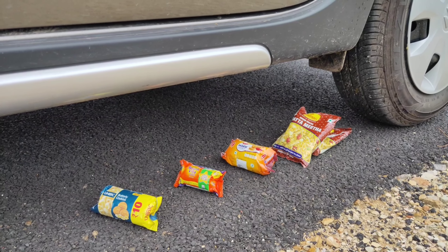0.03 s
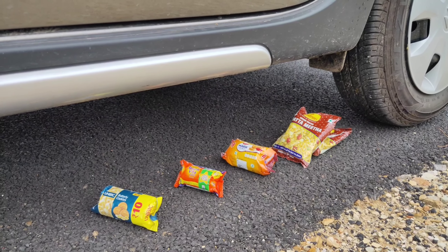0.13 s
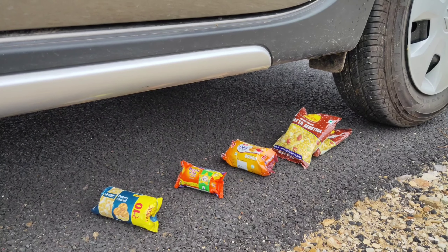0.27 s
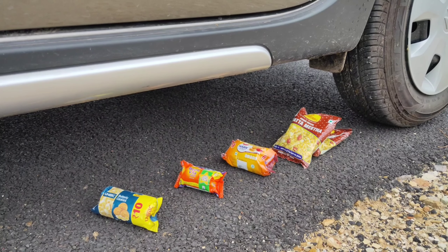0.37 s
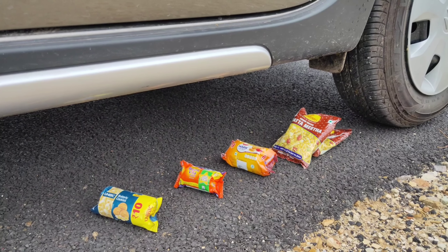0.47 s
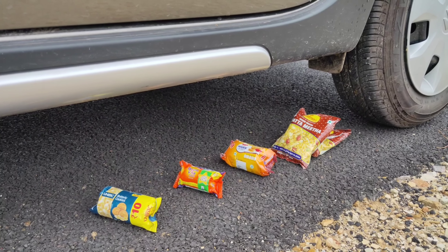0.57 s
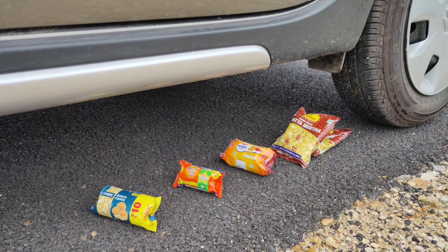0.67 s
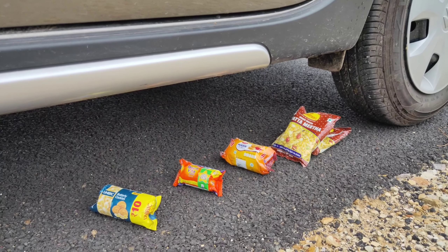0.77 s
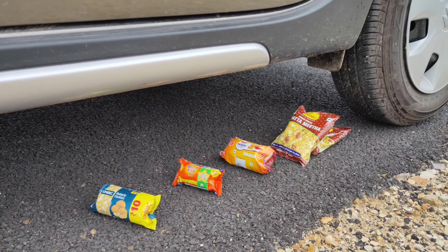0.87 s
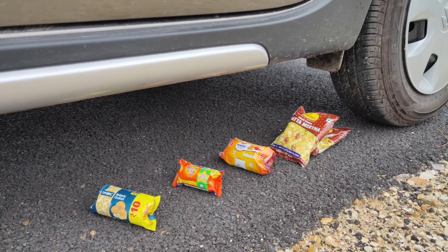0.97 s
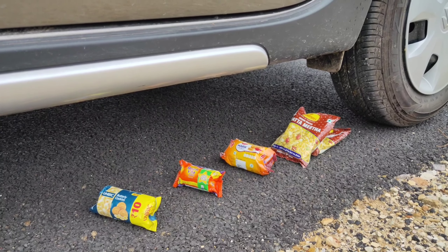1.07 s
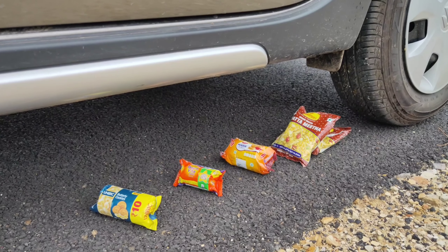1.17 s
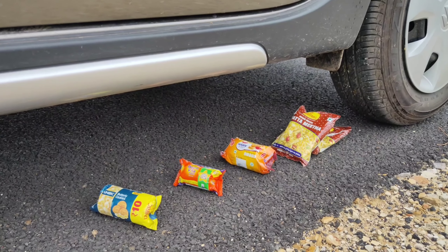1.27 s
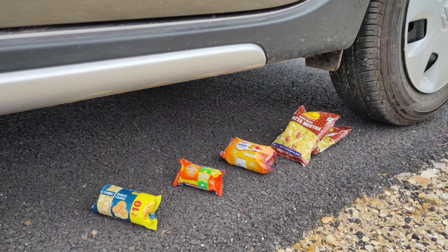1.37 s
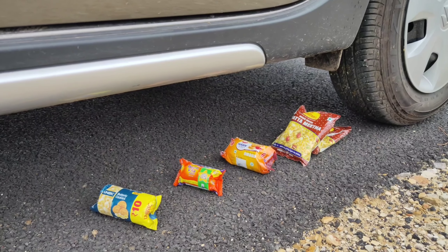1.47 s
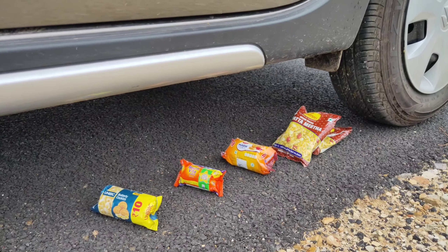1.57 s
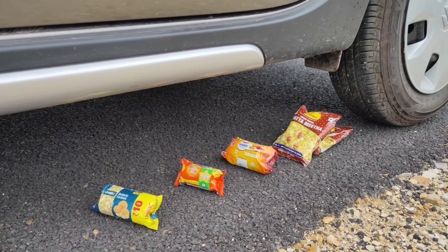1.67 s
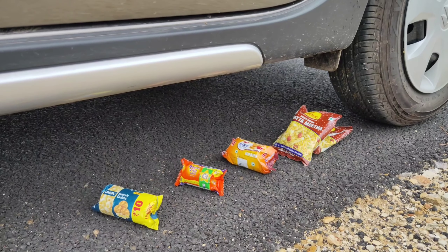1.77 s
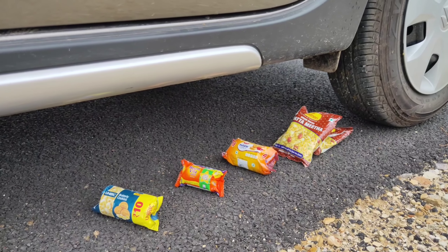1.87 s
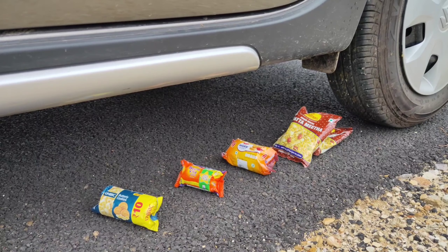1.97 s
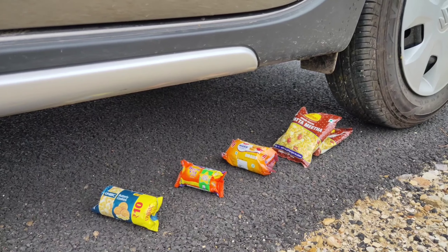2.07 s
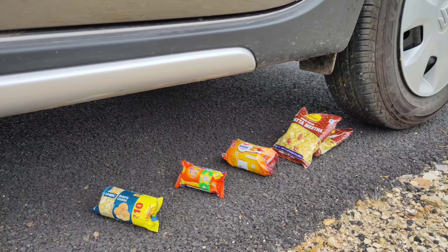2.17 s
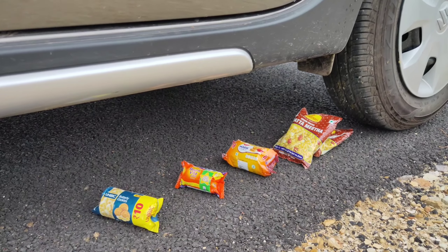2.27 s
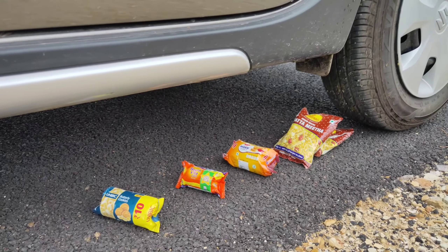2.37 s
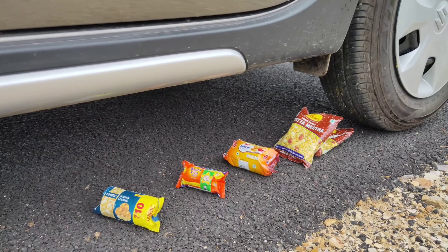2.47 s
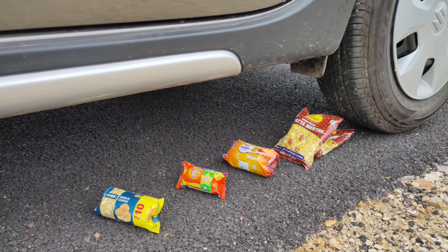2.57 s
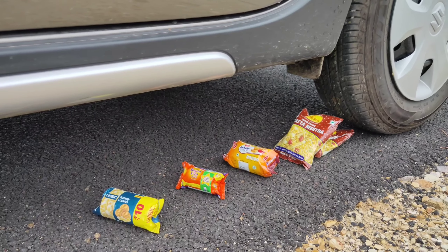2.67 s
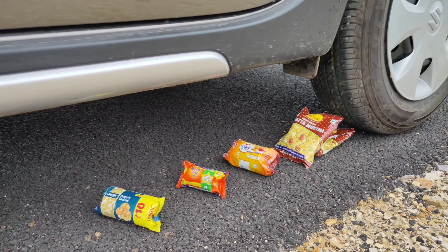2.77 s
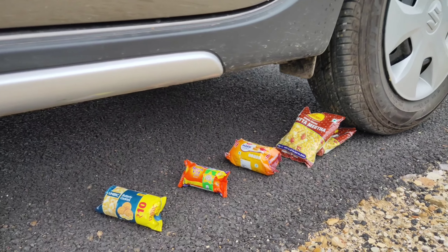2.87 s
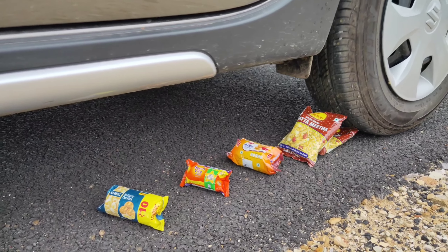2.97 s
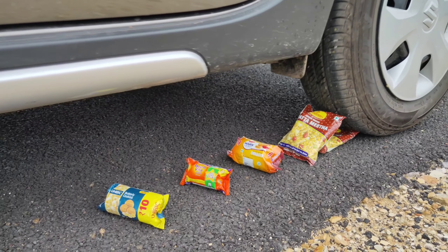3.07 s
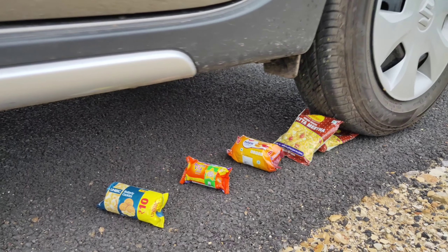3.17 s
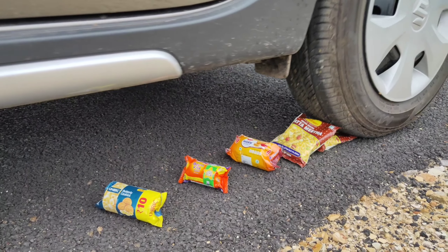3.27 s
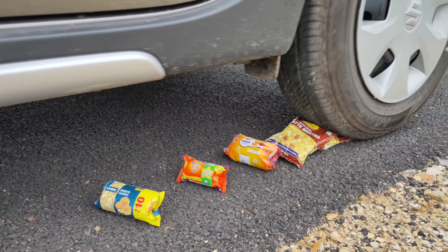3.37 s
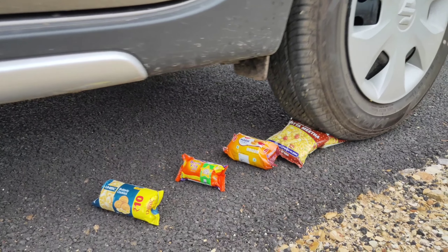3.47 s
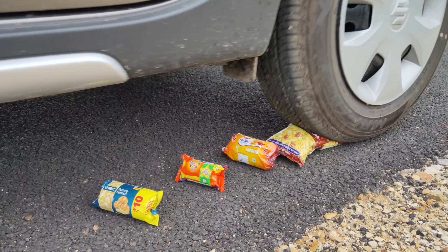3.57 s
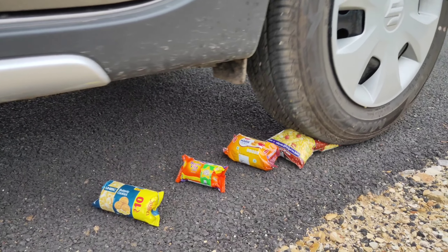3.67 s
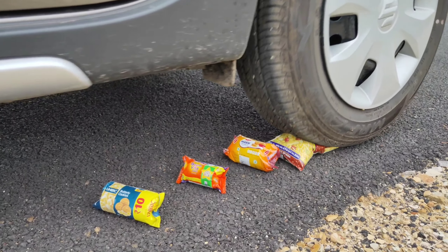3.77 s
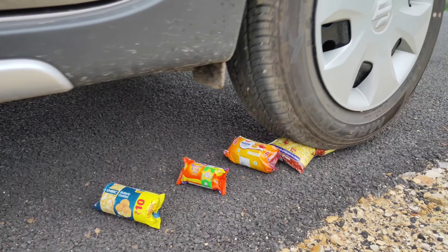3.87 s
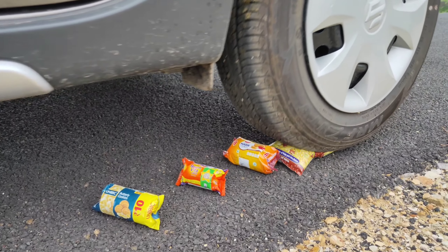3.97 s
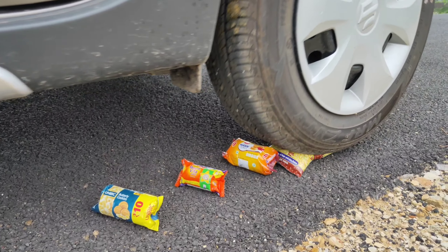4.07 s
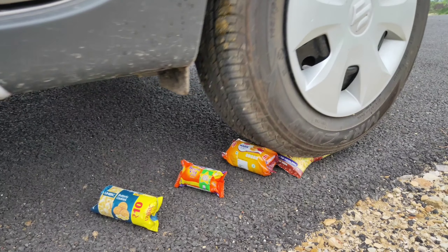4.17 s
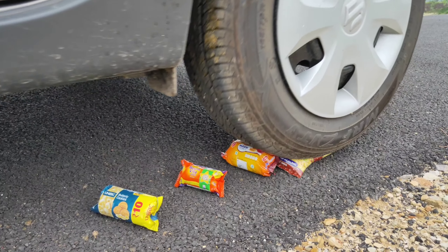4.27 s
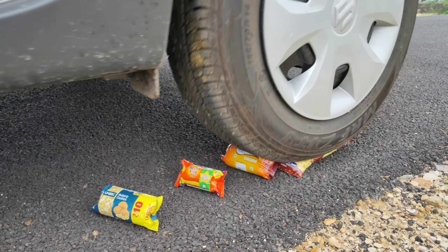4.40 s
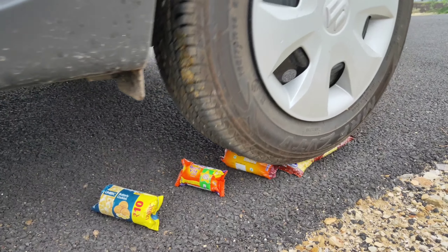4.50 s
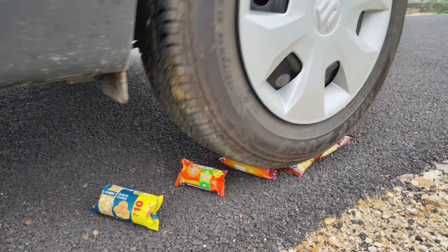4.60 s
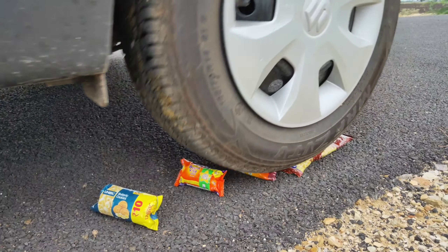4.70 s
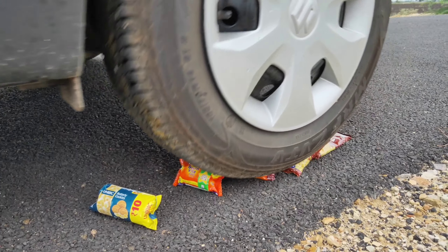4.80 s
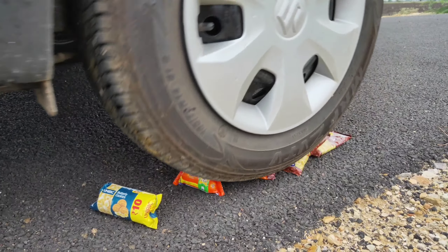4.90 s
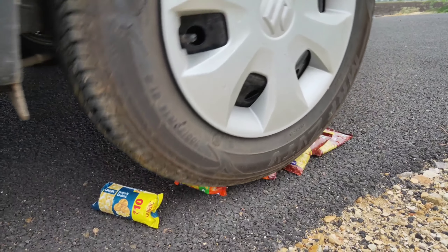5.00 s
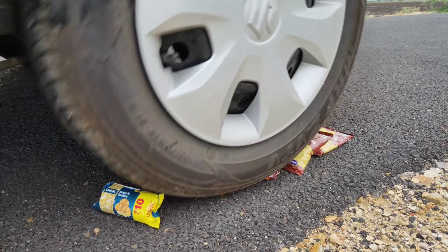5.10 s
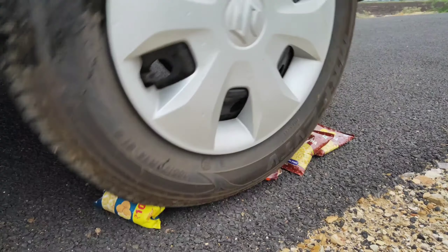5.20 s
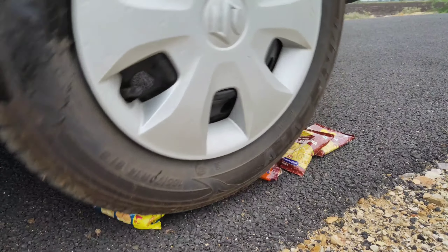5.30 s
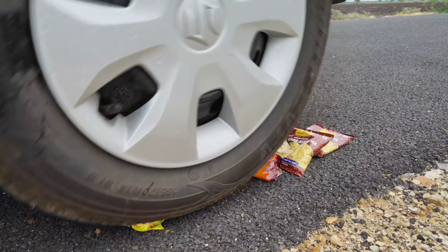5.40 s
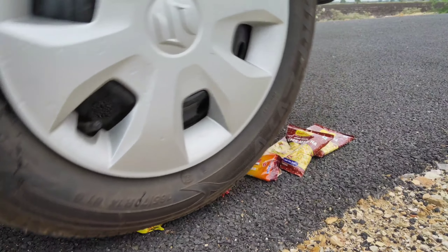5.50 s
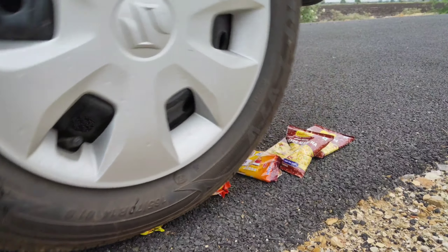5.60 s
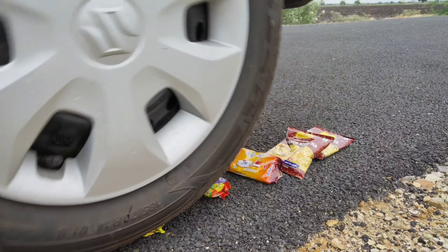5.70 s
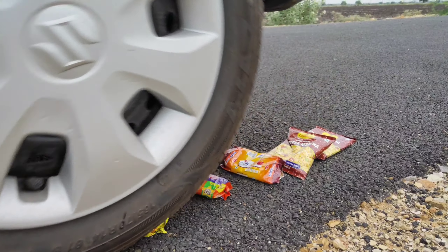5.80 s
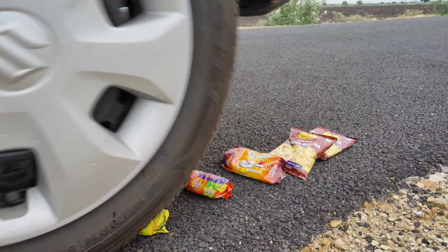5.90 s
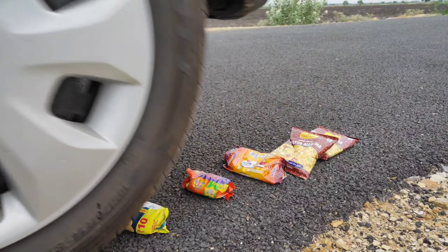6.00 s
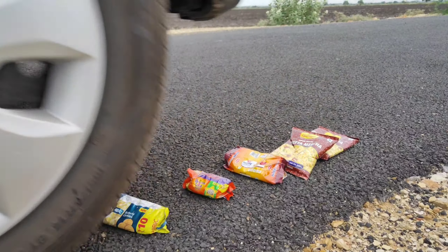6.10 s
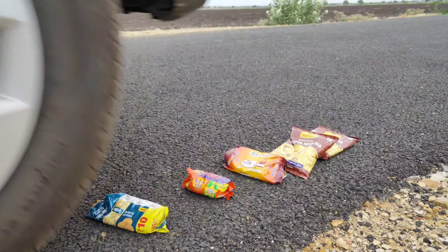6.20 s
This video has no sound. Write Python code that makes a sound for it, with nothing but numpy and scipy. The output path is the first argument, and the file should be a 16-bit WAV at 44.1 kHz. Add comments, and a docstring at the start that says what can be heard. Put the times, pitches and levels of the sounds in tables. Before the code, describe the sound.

Close, low phone pickup at a roadside. From 0 to 3.1 s there is only a soft, deep engine idle, throbbing rapidly and wavering, with small hollow whoops sagging in pitch around 0.3 s and from 0.9 to 1.8 s, over very faint hiss and a low flutter of air. At about 3.2 s the tyre touches the first packet: fine clicks and dull crunches swell to a first cluster around 3.4 to 3.8 s, ease slightly near 4.2 s, then thicken from 4.4 to 4.8 s with bright film ticks and dry biscuit splits. Another packet cracks at 5.0 s, and at 5.14 s one bursts with a loud, sharp pop, a brief hollow ring and scattering crumbs. Dense hard snaps continue to 5.5 s while the engine rumble peaks near 5.3 s. Afterwards the crackling thins to loose unfolding crinkles and isolated ticks at 5.74 and 6.09 s, over the receding engine.

```python
"""Car crushing snack packets

A car creeps over sealed snack packets on asphalt, heard from a phone held low. The idling engine is throbbing
filtered noise and wavering tones. Plastic film and biscuits crackle as random clicks, with louder timed cracks.
One packet bursts with a pop: a push of air, a suction and a short ring. Each crack echoes off road and underbody.
Faint background noise in flickering narrow bands and a low flutter of air lie behind."""
import sys
import numpy as np
from scipy import signal
from scipy.fft import rfft, irfft
from scipy.io import wavfile
from scipy.ndimage import uniform_filter1d, map_coordinates

SR = 44100
rng = np.random.default_rng(int(sys.argv[2]) if len(sys.argv) > 2 else 0)


def int16_out(signal):
    """Quantize to a 16-bit WAV file."""
    q = np.round(np.clip(np.atleast_2d(signal).T, -1, 1) * 32767)
    wavfile.write(sys.argv[1], SR, q.astype(np.int16))


N = 275625
TIME = np.arange(N) / SR


def undb(db):
    """Turn decibels into a gain."""
    return 10 ** (np.asarray(db) / 20)


def unit(x):
    """Scale to an average strength (rms) of 1."""
    return x / np.sqrt(np.mean(x ** 2))


def butter(x, order, hz, kind):
    """Keep only the low, high or middle ("band") frequencies."""
    return signal.sosfilt(signal.butter(order, hz, kind, fs=SR, output="sos"), x)


def curve(rows):
    """Join the (time, value) points of a table with straight lines."""
    times, values = np.transpose(rows)
    return np.interp(TIME, times, values)


def walk(rate):
    """Slow random drift with an rms of 1, taking about `rate` new directions a second."""
    step = int(SR / rate)
    held = np.repeat(rng.standard_normal(N // step + 4), step)
    smooth = uniform_filter1d(uniform_filter1d(held, step), step)
    return unit(smooth[step:step + N])


def colour(x, points, size=4096):
    """Filter to a (frequency, level) shape; the filter has unit energy and starts at once (minimum phase)."""
    hz, db = np.transpose(points)
    grid = np.maximum(np.fft.rfftfreq(size, 1 / SR), 1)
    shape = undb(np.interp(np.log(grid), np.log(hz), db))
    cepstrum = irfft(np.log(shape))
    response = irfft(np.exp(rfft(2 * cepstrum[:size // 2], size)))
    return signal.fftconvolve(x, response / np.linalg.norm(response))[:len(x)]


def tone(hz, t):
    """Steady sine wave."""
    return np.sin(2 * np.pi * hz * t)


def gliding_phase(hz):
    """Phase of a wave whose pitch changes: add up the cycles sample by sample."""
    return 2 * np.pi * np.cumsum(hz) / SR


def fade(t, t60):
    """Dying away by 60 dB in t60 seconds."""
    return np.exp(-np.log(1000) * t / t60)


def add(out, s, sound):
    """Mix a sound in at time s."""
    i = int(s * SR)
    out[i:i + len(sound)] += sound[:N - i]


def grains(rate, spread_db):
    """Random clicks of very unequal size, about `rate` a second, rms 1."""
    chance = rng.random(N)
    size = np.minimum(rng.exponential(size=N), 3.8)  # no click may grow without limit
    return unit((chance < rate / SR) * rng.choice([-1, 1], N) * undb(spread_db * size))


# bands of faint background noise: (centre [Hz], width [Hz], level [dB])
NOISE_BANDS = [(1508, 300, -88.5), (1927, 485, -81.5), (2710, 1300, -90.5), (4420, 1600, -89.5),
               (6595, 1230, -79)]


def flickering_noise(count=4):
    """Faint background noise: narrow bands whose levels flicker independently, with separate noise at each port."""
    flicker_db, flickers_per_s = 5.5, 24
    out = 0
    for hz, width_hz, db in NOISE_BANDS:
        edges = hz + width_hz * np.linspace(-.5, .5, count + 1)
        for low, high in zip(edges, edges[1:]):
            band = butter(rng.standard_normal((2, N)), 2, [low, high], "band")
            flickering = unit(band * undb(flicker_db * walk(flickers_per_s)))
            out = out + flickering * undb(db) / np.sqrt(count)
    return out


def breeze(db=-68):
    """A light, low flutter of air: deep noise, unrelated at the two ports."""
    return undb(db) * unit(butter(rng.standard_normal((2, N)), 2, 170, "low"))


# soft low whoops in the rumble: (time [s], peak level [dB])
WHOOP_TIMES = [(0.276, -48), (0.862, -44), (1.04, -40), (1.239, -41), (1.465, -41), (1.839, -39.5),
               (3.261, -45), (3.446, -43.5), (3.634, -41.5), (3.869, -40.5), (4.245, -42.5), (5.842, -42.5),
               (6.032, -44.5)]


def whoops(start_hz=188, end_hz=138):
    """Short hollow tones that swell, die down and sag in pitch."""
    length_s, lead_s = .09, .026  # each starts a little before its listed time
    out, t = np.zeros(N), TIME[:int(length_s * SR)]
    hz = start_hz + (end_hz - start_hz) * t / length_s
    swell = np.sin(np.pi * t / length_s) ** 2
    for s, db in WHOOP_TIMES:
        add(out, s - lead_s, undb(db) * swell * np.sin(gliding_phase(hz)))
    return out


# tone colour of the engine rumble: (frequency [Hz], relative level [dB])
RUMBLE_COLOUR = [(25, -22.5), (45, -20), (75, -11.5), (115, -4), (160, -5.5), (200, -8.5), (250, -8.5),
                 (420, -17), (540, -13.5), (700, -16.5), (900, -31), (1200, -40.5), (3000, -70)]
# rumble level as the car draws level and passes, before its random wobble: (time [s], level [dB])
RUMBLE_LEVEL = [(0, -55.5), (1.7, -53), (2.1, -52.5), (4.2, -52), (5.3, -46), (6.25, -53)]
# tones of the idling car, before wobble and fade: (frequency [Hz], level [dB])
IDLE_TONES = [(21.7, -56.5), (65.3, -76.5), (157, -60), (300.5, -60), (547, -66.5)]
FIRING_HZ = 22.95  # average, it wavers a little
HUM_FADE_DB_PER_S = .5


def engine():
    """Rumble that throbs with each firing, under wavering tones that fade as the engine moves away."""
    throb = 1 + 0.17 * np.cos(gliding_phase(FIRING_HZ * (1 + 0.013 * walk(2.7))))
    rumble = colour(rng.standard_normal(N) * throb, RUMBLE_COLOUR)
    rumble = rumble * undb(curve(RUMBLE_LEVEL) + 1.3 * walk(11.0))
    hum = 0
    for hz, db in IDLE_TONES:
        level = undb(db + 2 * walk(19))
        hum = hum + level * unit(np.sin(gliding_phase(hz * (1 + 0.009 * walk(12)))))
    return rumble + hum * undb(-HUM_FADE_DB_PER_S * TIME)


UNFOLD_T60 = 4.54  # s, slow tail of unfolding film and loose crumbs


def squeeze(flat_s, squeeze_s, hold_s, t60, tail_db):
    """Strain grows until the packet is flat, holds, then drops, leaving a weak, slow tail."""
    before = np.maximum(flat_s - TIME, 0)
    after = np.maximum(TIME - flat_s - hold_s, 0)
    return np.exp(-before / squeeze_s) * np.hypot(fade(after, t60), undb(tail_db) * fade(after, UNFOLD_T60))


# packets going under the tyre: (flattest at [s], squeeze time [s], hold [s],
#   relative film crinkle level [dB], relative biscuit crunch level [dB], lag of the left port [ms])
PACKET_ROW = [(3.579, 0.22, 0.058, -47.5, -41.5, -0.095), (3.764, 0.12, 0.031, -47, -57.5, -0.065),
              (4.472, 0.16, 0.32, -41.5, -42, 0.049), (5.036, 0.17, 0.14, -43, -45.5, 0.041),
              (5.339, 0.04, 0.14, -40, -39.5, 0.255)]
CRUNCH_T60, CRINKLE_T60 = 1, 0.54  # s
UNFOLD_DB, LEFTOVER_DB = -11, -19  # unfolding film and loose crumbs, against the packet's peak
TOUCH_S, LEAVE_S, LEAVE_T60 = 3.16, 5.96, 0.88  # the tread meets the first packet and rolls off the last
GRIP_S = 0.05  # the tread takes hold gradually
CRUNCH_SHARE = 0.7  # biscuits break mostly in the later part of the squeeze


def strain():
    """Crinkle and crunch levels, packet by packet; film holds under full weight while crunch already fades."""
    grip = np.clip((TIME - TOUCH_S) / GRIP_S, 0, 1) ** 2
    contact = grip * fade(np.maximum(TIME - LEAVE_S, 0), LEAVE_T60)
    crinkle = crunch = 0  # the packets add up as powers
    for s, squeeze_s, hold_s, film_db, crumb_db, _ in PACKET_ROW:
        film = squeeze(s, squeeze_s, hold_s, CRINKLE_T60, UNFOLD_DB)
        crumbs = squeeze(s, CRUNCH_SHARE * squeeze_s, 0, CRUNCH_T60, LEFTOVER_DB)
        crinkle += (undb(film_db) * film) ** 2
        crunch += (undb(crumb_db) * crumbs) ** 2
    return contact * np.sqrt(crinkle), contact * np.sqrt(crunch)


RATE_POWER = 0.5  # the harder the squeeze, the more grains a second


def crackle(level, rate, spread_db):
    """Clicks that follow a level: sparser under light strain, denser under heavy; `rate` is the densest."""
    density = np.maximum(level / level.max(), .03) ** RATE_POWER
    return level * unit(grains(rate * density, spread_db) / np.sqrt(density))


# tone colour of crinkling film: (frequency [Hz], relative level [dB])
FILM_COLOUR = [(300, 0), (1000, -10), (1500, -3), (2100, -0.5), (2600, -7.5), (3200, -2.5), (4200, -0.5),
               (5600, 2.5), (6700, 10), (7400, 5), (8100, -21.5)]
# tone colour of breaking crumbs, also used for splinters and spilling: (frequency [Hz], relative level [dB])
CRUMB_COLOUR = [(60, -29.5), (150, -9), (400, -0.5), (620, -1.5), (950, -1), (1110, -7), (1280, -10),
                (1520, -17.5), (2100, -11), (3500, -20), (8000, -40.5)]


def crushing(crinkle, crunch, film_db=-1.5, crumb_db=-2.5, shared=0.81):
    """One spot under the tread: creases flip in the film and crumbs break beneath it, in fits and starts."""
    fits_db, fits_per_s = 2.6, 140
    fits = unit(undb(fits_db * walk(fits_per_s)))
    film = crackle(crinkle, rate=950, spread_db=4.3)
    crumbs = crackle(crunch, rate=450, spread_db=3.9)
    both = shared * grains(rate=160, spread_db=-0.5)  # some breaking crumbs flip the film too
    # each patch of film is creased its own way and has its own colour
    patch = [(hz, db + 2 * rng.standard_normal()) for hz, db in FILM_COLOUR]
    film_sound = colour((film + both * crinkle) * fits, patch)
    crumb_sound = colour((crumbs + both * crunch) * fits, CRUMB_COLOUR)
    return undb(film_db) * film_sound + undb(crumb_db) * crumb_sound


def snap(buckle_s=.0014, rustle=.12, rustle_t60=.04, click=3.):
    """A sharp click and a quick run of tiny ones, then a rustle, as when taut film buckles; unit energy."""
    t = TIME[:SR // 10]
    clicks = rng.standard_normal(len(t)) * np.exp(.5 * rng.standard_normal(len(t)))
    run = clicks * (np.exp(-t / buckle_s) + rustle * fade(t, rustle_t60))
    run[0] = click
    return run / np.linalg.norm(run)


# the loudest fractures: (time [s], relative levels of film tick, biscuit split and knock [dB], knock pitch [Hz])
FRACTURES = [(3.2136, -22.5, -25.5, -35.5, 300.0), (3.2432, -30, -21, -33, 440.0),
             (3.2962, -33, -33, -30.5, 440.0), (3.3447, -33, -22, -41, 930.0),
             (3.3936, -16, -25.0, -27.5, 440.0), (3.458, -16, -23, -38.0, 470.0),
             (3.5547, -18, -16, -23.5, 740.0), (3.5796, -19, -32, -18, 690.0),
             (3.5978, -25, -20, -30, 710.0), (3.6427, -8.5, -21, -42.0, 380.0),
             (3.6934, -30, -20.5, -27, 410.0), (3.7319, -16.5, -23, -27, 950.0),
             (3.7638, -15, -33, -23.5, 890.0), (3.8036, -21, -19, -37, 930.0),
             (3.8167, -18.5, -24, -45, 430.0), (3.9484, -18.5, -40, -44.0, 260.0),
             (3.9936, -16.5, -17, -39.5, 590.0), (4.02, -28, -34, -50.0, 270.0),
             (4.0587, -19, -26.5, -51, 460.0), (4.0709, -20.5, -31, -50, 270.0),
             (4.2372, -19.5, -35.5, -50, 560.0), (4.2931, -18.5, -31, -31, 610.0),
             (4.3747, -15, -17, -29, 580.0), (4.4084, -18.5, -21.5, -24.5, 930.0),
             (4.4572, -23, -17.5, -24, 880.0), (4.4905, -13, -16, -38, 940.0),
             (4.5002, -19, -21, -31.5, 450.0), (4.5183, -10, -28, -19, 730.0),
             (4.5224, -11.5, -26, -30, 720.0), (4.556, -14.0, -25, -19.5, 420.0),
             (4.6301, -13.5, -13.5, -22, 570.0), (4.639, -23, -21.0, -30.5, 360.0),
             (4.6537, -14.5, -18.5, -33, 540.0), (4.6863, -28, -21, -27, 920.0),
             (4.6974, -15, -18.0, -33, 520.0), (4.7695, -13, -15, -33.5, 260.0),
             (4.9463, -30, -26, -30, 410.0), (4.9547, -25, -36, -30.5, 430.0),
             (5.0033, -12.5, -21.5, -14, 420.0), (5.0144, -22, -16.0, -21, 440.0),
             (5.022, -13.5, -15.5, -24, 410.0), (5.0593, -22.5, -15, -28.5, 440.0),
             (5.081, -15.5, -23, -25, 360.0), (5.0965, -13, -18.5, -16.5, 420.0),
             (5.1744, -12.5, -7.5, -20, 270.0), (5.1791, -6.5, -17, -23, 470.0),
             (5.2051, -19, -19, -30, 460.0), (5.2534, -23, -18.5, -41.5, 530.0),
             (5.312, -12, -19, -38.5, 720.0), (5.3284, -27, -17, -36.5, 890.0),
             (5.3458, -13.5, -17, -44, 780.0), (5.3518, -18, -20, -41, 260.0),
             (5.373, -22, -25, -32, 510.0), (5.387, -9, -19.5, -20.0, 670.0),
             (5.4181, -11.0, -13.5, -15.5, 390.0), (5.4273, -11.5, -24, -24, 440.0),
             (5.449, -24, -28, -32, 380.0), (5.4674, -17, -29, -26.5, 260.0),
             (5.5227, -22, -23.5, -29.5, 420.0), (5.74, -37, -27.5, -37.5, 740.0),
             (6.087, -25.5, -34.5, -39, 320.0)]
# tone colour of a film tick: (frequency [Hz], relative level [dB])
TICK_COLOUR = [(1000, -18), (4200, -18.5), (5600, -7), (6800, 8), (7400, 2), (8100, -18)]
# tone colour of a biscuit split: (frequency [Hz], relative level [dB])
SPLIT_COLOUR = [(400, -13), (1100, -2.5), (1260, -2.5), (1520, -3.5), (2100, -5.5), (2650, -12.5),
                (3100, -4), (4500, -1.5), (5600, 1.5), (7500, -19.5)]


def own_colour(shape, spread_db=2.0):
    """Shift each point of a tone colour by chance, since no two creases or pieces are alike."""
    return [(hz, db + spread_db * rng.standard_normal()) for hz, db in shape]


def cracks(tick_db=0, split_db=1, knock_db=0, cycles=5.63, splinter_db=-8, splinter_t60=0.059, low_cut_hz=150):
    """A biscuit splits, knocks for a few cycles and splinters; the film ticks differently toward each port."""
    splits, knocks, splinters = np.zeros((3, N))
    ticks, t = np.zeros((2, N)), TIME[:SR // 10]
    for s, film_db, break_db, body_db, hz in FRACTURES:
        crease, piece = own_colour(TICK_COLOUR), own_colour(SPLIT_COLOUR)
        for port in ticks:
            add(port, s, undb(film_db + tick_db) * colour(snap(), crease))
        add(splits, s, undb(break_db + split_db) * colour(snap(), piece))
        add(knocks, s, undb(body_db + knock_db) * tone(hz, t) * fade(t, cycles / hz))
        add(splinters, s, undb(body_db + splinter_db) * fade(t, splinter_t60) / 2)
    knocks = butter(knocks, 1, low_cut_hz, "high")  # the knocks carry little deep bass
    splintering = colour(splinters * grains(rate=3100, spread_db=2.5), CRUMB_COLOUR)
    return splits + knocks + splintering, ticks


# tone colour of the tearing film: (frequency [Hz], relative level [dB])
TEAR_COLOUR = [(300, -9.5), (1300, 9), (1550, -7.5), (2100, 9.5), (2700, 2.5), (4000, -0.5), (6700, 2),
               (8000, -7.5)]
POP_S = 5.1441  # when the packet bursts


def tear(tear_db=7.5, fray_db=-9):
    """The seam frays for an instant, then the film whips apart, differently toward each port."""
    out, fray_s = np.zeros((2, N)), .003
    for port in out:
        add(port, POP_S - fray_s, undb(fray_db) * colour(snap(), TEAR_COLOUR))
        add(port, POP_S, undb(tear_db) * colour(snap(buckle_s=0.00073), TEAR_COLOUR))
    return out


# the burst packet's ring: (frequency [Hz], level [dB], time to fall 60 dB [s])
POP_RING = [(141.7, -24, 0.27), (209, -31, 0.13), (256, -27, 0.1), (472, -36.5, 0.14), (726, -20.5, 0.018),
            (974, -14, 0.017), (1295, -26.5, 0.049)]


def pop(blast_db=-4, seam_db=-10, spill_db=-35, spill_t60=0.28, flap_db=-27, flap_t60=0.27):
    """The seam gives, trapped air escapes in one push and suction; the slack packet flaps and crumbs spill."""
    out, t = np.zeros(N), TIME[:SR // 3]
    push_s, seam_lead_s, suction = .0007, .0011, .55
    push = np.sin(np.pi * t / push_s) * (t < push_s)
    pull = np.sin(np.pi * t / (2 * push_s)) * (t < 2 * push_s)  # weaker but twice as long
    ring = sum(undb(db) * tone(hz, t) * fade(t, t60) for hz, db, t60 in POP_RING)
    spill = colour(grains(rate=1500, spread_db=3)[:len(t)] * fade(t, spill_t60), CRUMB_COLOUR)
    flaps = unit(butter(grains(rate=370, spread_db=2.5), 2, [120, 560], "band"))
    add(out, POP_S - seam_lead_s, undb(seam_db) * push)
    add(out, POP_S, undb(blast_db) * push + undb(spill_db) * spill)
    add(out, POP_S, undb(flap_db) * flaps[:len(t)] * fade(t, flap_t60))
    add(out, POP_S + push_s, -undb(blast_db) * suction * pull - ring)
    return out


def underbody(x, early_db=-8, late_db=-19, late_t60=0.7):
    """Scattered echoes from wheel arch, floor pan and road, different at each port; long waves slip past."""
    t, early_t60, scatter_hz = TIME[:SR // 3], .03, 700
    response = 0
    for db, t60 in [(early_db, early_t60), (late_db, late_t60)]:
        tail = rng.standard_normal((2, len(t))) * fade(t, t60) * (t > .0015)  # echoes arrive after 1.5 ms
        response = response + undb(db) * unit(tail)
    response = butter(response, 1, scatter_hz, "high")
    return signal.fftconvolve(x[None], response / np.sqrt(len(t)), axes=1)[:, :N]


def ports(x, lag_ms, pan_db):
    """Sound reaches the two microphone ports at different times and levels; positive: left later, louder."""
    half = lag_ms * SR / 2000  # samples: half the lag for each port
    left, right = (map_coordinates(x, [np.arange(N) - side * half], order=3) for side in (1, -1))
    return np.array([left * undb(pan_db / 2), right * undb(-pan_db / 2)])


TYRE_PAN_DB = 0.5


def scene(spread_ms=0.11, count=3, pop_echo_db=-4):
    """Packets crushed at several spots across the tread, with echoes; the engine off to the right."""
    crinkle, crunch = strain()
    places = np.linspace(-1, 1, count) * spread_ms
    spots = [(crushing(crinkle, crunch) / np.sqrt(count), place) for place in places]
    fractures, ticks = cracks()
    spots.append((fractures, 0))
    burst, film = pop(), ticks + tear()
    crushed = sum(x for x, _ in spots)
    echoes = underbody(crushed + film.mean(axis=0) + undb(pop_echo_db) * burst)
    # the sound moves from packet to packet
    lag_ms = curve([(s + hold_s, lag) for s, _, hold_s, _, _, lag in PACKET_ROW])
    near = sum(ports(x, lag_ms + offset, TYRE_PAN_DB) for x, offset in spots + [(burst, 0)])
    car = ports(engine() + whoops(), lag_ms=0.33, pan_db=-0.2)
    return near + film + echoes + car + flickering_noise() + breeze()


TOP_HZ = 7900  # the phone passes little above this


def record(dry, dip=0.25):
    """The phone's left port is duller in the low treble; it thins deep bass, rounds loud peaks, cuts the top."""
    bass_hz, ceiling, dip_hz = 55, .85, (1300, 3800)
    heard = dry - np.array([[dip], [0]]) * butter(dry, 1, dip_hz, "band")
    thin = butter(heard, 2, bass_hz, "high")
    rounded = ceiling * np.tanh(thin / ceiling)
    return signal.sosfilt(signal.ellip(8, .2, 70, TOP_HZ, fs=SR, output="sos"), rounded)


dry = scene()
out = record(dry)
int16_out(out)
```